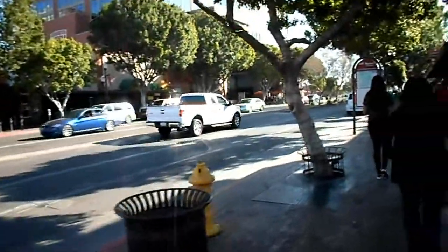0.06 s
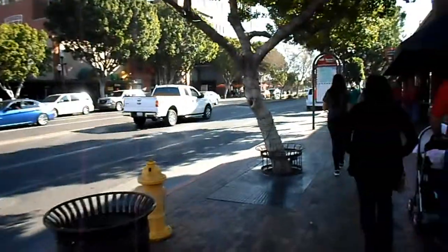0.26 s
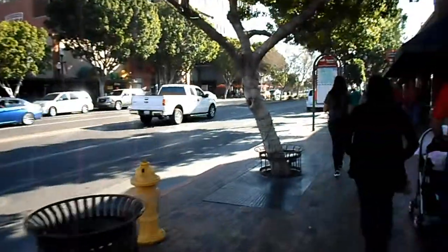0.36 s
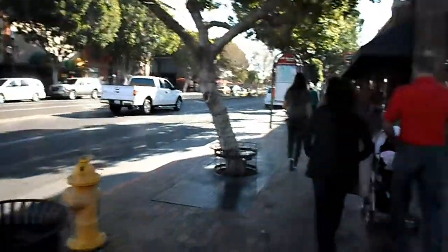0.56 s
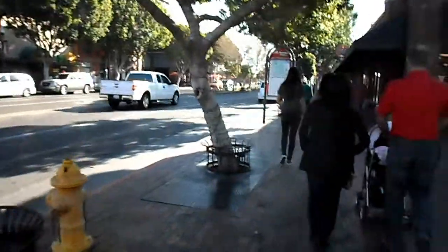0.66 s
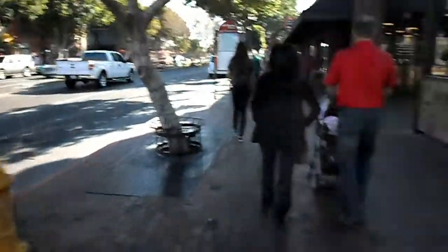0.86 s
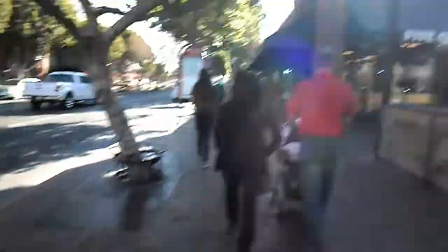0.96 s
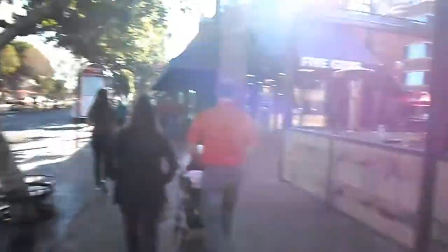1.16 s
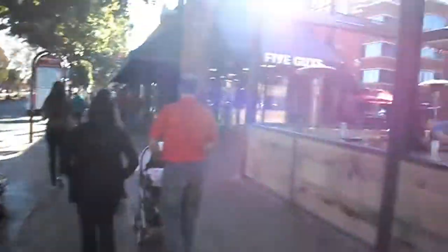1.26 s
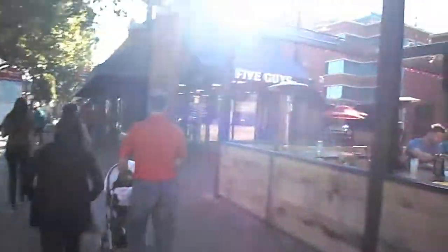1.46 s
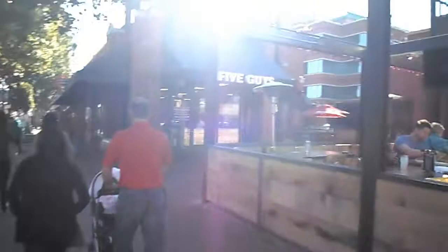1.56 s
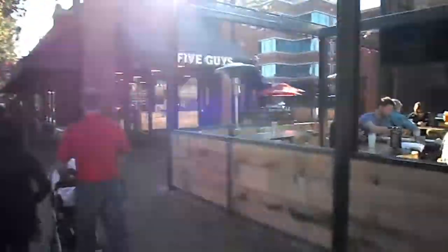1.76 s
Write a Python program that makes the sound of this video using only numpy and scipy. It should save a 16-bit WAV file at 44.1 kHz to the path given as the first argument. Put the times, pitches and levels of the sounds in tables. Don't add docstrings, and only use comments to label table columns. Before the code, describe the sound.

A carried camera is jolted: a thump, a cluster of thuds, one hardest blow, then another with bright clicks. Wind buffets the microphone and far street traffic drones, ducking after blows, with thin electronic whistles.

```python
import sys
import numpy as np
from scipy import signal
from scipy.io import wavfile
from scipy.ndimage import uniform_filter1d

SR = 44100
rng = np.random.default_rng(int(sys.argv[2]) if len(sys.argv) > 2 else 0)


def boost_factor(decibels):
    exponent = np.asarray(decibels, float) / 20
    return 10 ** exponent


def store_pcm(level_fs):
    pcm = np.round(np.clip(level_fs, -1, 1) * 32767).astype(np.int16)
    wavfile.write(sys.argv[1], SR, np.atleast_2d(pcm).T)


N = 79380

# t/s, level/dB
TRAFFIC_LEVEL = [(0, -48.5), (.3, -45), (.7, -44), (1.1, -41.5), (1.4, -41), (1.8, -41)]
# f/Hz, level per Hz/dB
ROAR_TONE = [(88, -31), (150, -10.5), (250, -8), (330, -17), (500, -14), (900, -17), (1500, -29),
             (3000, -42.5), (6600, -120)]
# f/Hz, level per Hz/dB
HISS_TONE = [(880, -26.5), (1500, -5.5), (2490, -17), (4060, -8.5), (4520, -15.5), (7820, -14),
             (10900, -14), (14200, -49), (22000, -120)]
HISS_DB = -64
DRONE_HZ, DRONE_WIDTH_HZ, DRONE_DB = 118.15, 9, -33

# t/s, level/dB
WIND_LEVEL = [(0, -20), (.18, -19.5), (.3, -20.5), (.6, -23.5), (.8, -18.5), (1, -21), (1.2, -20.5),
              (1.45, -20), (1.6, -20), (1.8, -24.5)]
# f/Hz, level per Hz/dB
WIND_TONE = [(9, -26.5), (15, -1.5), (35, 0.5), (60, -8), (100, -18), (150, -22.5), (250, -25),
             (400, -37.5), (880, -110)]
GUST_DB, LUMP_DB = 1.2, 1.5

# t/s, level/dB, ring f/Hz
CASE_CLICKS = [
    (.372, -43, 2400),
    (.535, -41, 2200),
    (1.138, -45, 2800),
    (1.3655, -29.5, 4300),
    (1.370, -36, 4000),
    (1.3915, -35, 2500),
    (1.4375, -43, 1800),
]
CLICK_T60_S = .005

# t/s, level/dB, ring f/Hz
CASE_KNOCKS = [
    (.440, -24, 150),
    (.455, -23, 230),
    (.556, -19, 105),
    (.872, -18, 210),
    (1.325, -30, 150),
]
# f/Hz, level per Hz/dB
RATTLE_TONE = [(50, -17), (100, -2.5), (220, 0.5), (330, -12), (550, -18), (1000, -36.5), (3000, -67)]
KNOCK_RISE_S, RATTLE_DB = .009, -7

# swing through zero t/s, push level/dB, push length/s, pull level/dB, pull length/s
STEP_JOLTS = [
    (.2216, 4.4, .0235, 8.5, .038),
    (.3681, -4, .0458, -2.8, .0292),
    (.4488, 6, .0388, -2, .0062),
    (.4531, -.7, .0092, 10.2, .0255),
    (.4675, -2, .005, 5.6, .018),
    (.5535, 2.1, .042, -1.9, .0385),
    (.8697, 10.9, .019, 11.3, .016),
    (.880, -20, .006, 4.5, .024),
    (1.325, 4.4, .017, 4.2, .019),
    (1.4422, -8.5, .0174, -9.5, .0193),
]
REBOUND, REBOUND_S = .416, .052
PULL_SKEW, PUSH_SKEW = .777, 1.64
CASE_HZ = 280

CEILING_UP, CEILING_DOWN = .85, .87
STEP_DB, CHECKS_PER_S, RECOVER_DB_PER_S = .37, 9000, 9

CLOCK_HZ = 3933.5
CLOCK_WOBBLE = [-11, -14.5, -15.5, -23, -22]
CLOCK_WHISTLE = [-69.5, -72, -85.5, -84.5, -94.5]
EDGE_HZ, TOP_HZ = 10720, 15900
BLOCK_HZ = 1.7


def evened(x):
    return x / np.sqrt(np.mean(x ** 2) + 1e-20)


def curve(points):
    s, db = np.transpose(points)
    return boost_factor(np.interp(np.arange(N) / SR, s, db))


def add(mix, s, sound):
    part = mix[round(s * SR):][:len(sound)]
    part += sound[:len(part)]


def noise(tone, size, patchy_db, flicker_db):
    frames = 4 * N // size + 5
    hz = np.fft.rfftfreq(size, 1 / SR)
    a, b, patches = rng.standard_normal((frames, len(hz), 3)).T
    patches = uniform_filter1d(patches, size=9, axis=0)
    patches = evened(uniform_filter1d(patches, size=7, axis=1))
    flicker = evened(uniform_filter1d(rng.standard_normal(frames), size=3))
    f, db = np.transpose(tone)
    shape = np.interp(np.log(hz + 1), np.log(f + 1), db)[:, None]
    z = (a + 1j * b) * boost_factor(shape + patchy_db * patches + flicker_db * flicker)
    return evened(signal.istft(z, nperseg=size, noverlap=size * 3 // 4)[1][:N])


def hiss():
    return boost_factor(HISS_DB) * noise(HISS_TONE, size=256, patchy_db=1.9, flicker_db=1.6)


def traffic():
    return curve(TRAFFIC_LEVEL) * noise(ROAR_TONE, size=512, patchy_db=0.7, flicker_db=1.5)


def engine_drone():
    memory = np.exp(-np.pi * DRONE_WIDTH_HZ / SR)
    wobble = signal.lfilter([1], [1, -memory], rng.standard_normal((N, 2)) @ [1, 1j])
    waver = 1.5 + wobble / abs(wobble).mean()
    note = np.exp(2j * np.pi * DRONE_HZ * np.arange(N) / SR)
    return boost_factor(DRONE_DB) * evened((waver * note).real)


def wind():
    return curve(WIND_LEVEL) * noise(WIND_TONE, size=2048, patchy_db=LUMP_DB, flicker_db=GUST_DB)


def case_clicks():
    out, t = np.zeros(N), np.arange(900) / SR
    for s, db, hz in CASE_CLICKS:
        ring = np.sin(2 * np.pi * hz * t)
        ring += .8 * np.sin(2 * np.pi * .52 * hz * t)
        ring += .12 * rng.standard_normal(len(t))
        add(out, s, boost_factor(db - 60 * t / CLICK_T60_S) * ring)
    return out


def case_knocks():
    swells, rings = np.zeros(N), np.zeros(N)
    t = np.arange(0, 8 * KNOCK_RISE_S, 1 / SR)
    for s, db, hz in CASE_KNOCKS:
        swell = boost_factor(db) * t / KNOCK_RISE_S * np.exp(1 - t / KNOCK_RISE_S)
        add(swells, s - KNOCK_RISE_S, swell)
        add(rings, s - KNOCK_RISE_S, swell * np.sin(2 * np.pi * hz * t))
    rattle = swells * noise(RATTLE_TONE, size=512, patchy_db=1.45, flicker_db=0.4)
    return rings + boost_factor(RATTLE_DB) * rattle


def step_jolts():
    out = np.zeros(N)
    for s, push_db, push_s, pull_db, pull_s in STEP_JOLTS:
        u, v, w = (np.arange(0, 1, 1 / (SR * d)) for d in (push_s, pull_s, REBOUND_S))
        push = boost_factor(push_db) * np.sin(np.pi * u ** PUSH_SKEW) * np.sqrt(u)
        pull = -boost_factor(pull_db) * np.sin(np.pi * v ** PULL_SKEW)
        rebound_size = REBOUND * boost_factor(pull_db) * pull_s / .03
        rebound = rebound_size * np.sin(np.pi * w ** .7) * (1 - w)
        add(out, s - push_s, push)
        add(out, s, pull)
        add(out, s + pull_s, rebound)
    return signal.filtfilt(*signal.butter(2, CASE_HZ, fs=SR), out)


def scene():
    air = wind()
    street = engine_drone() + traffic() + hiss()
    handling = step_jolts() + case_knocks() + case_clicks()
    return (air + street + handling)[None]


def stepped_gain(x):
    over_db = 20 * np.log10(np.maximum(x / CEILING_UP, -x / CEILING_DOWN) + 1e-9)
    checked = rng.random(N) < CHECKS_PER_S / SR
    over_db = np.where(checked, over_db, -99)
    recovery = RECOVER_DB_PER_S * np.arange(N) / SR
    steps = STEP_DB * np.ceil(over_db / STEP_DB)
    cut_db = np.maximum.accumulate(steps + recovery) - recovery
    return boost_factor(-np.maximum(cut_db, 0))


def unsteady_clock(x, gain):
    overtones = np.arange(len(CLOCK_WOBBLE)) + 1
    clock = np.sin(2 * np.pi * CLOCK_HZ * np.outer(np.arange(N) / SR, overtones))
    wobble = np.gradient(x) * (clock @ boost_factor(np.array(CLOCK_WOBBLE)))
    whistle = gain * (clock @ boost_factor(np.array(CLOCK_WHISTLE)))
    return x + wobble + whistle


def roll_off(x):
    return signal.sosfilt(signal.butter(12, 15910, fs=SR, output="sos"), x)


def record(dry):
    x = dry[0]
    gain = stepped_gain(x)
    x = signal.oaconvolve(x * gain, signal.firwin(63, EDGE_HZ, fs=SR), "same")
    x = unsteady_clock(x, gain)
    x = signal.lfilter([1, -1], [1, -np.exp(-2 * np.pi * BLOCK_HZ / SR)], x)
    held = np.repeat(x[::2], 2)[:N]
    x = signal.oaconvolve(held, signal.firwin(255, TOP_HZ, fs=SR), "same")
    return roll_off(x[None])


dry = scene()
out = record(dry)
store_pcm(out)
```